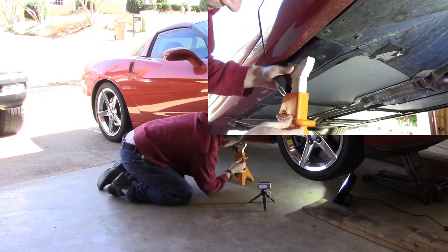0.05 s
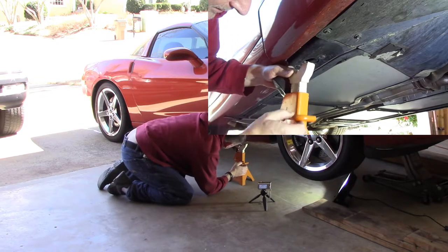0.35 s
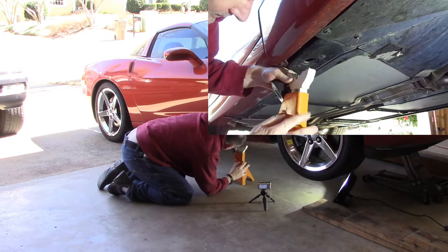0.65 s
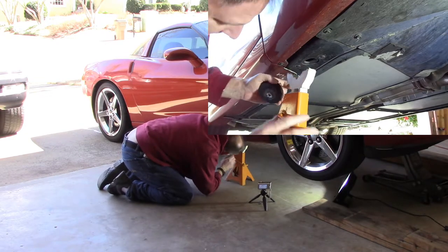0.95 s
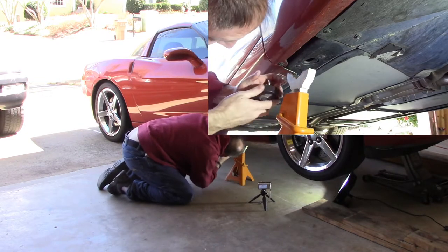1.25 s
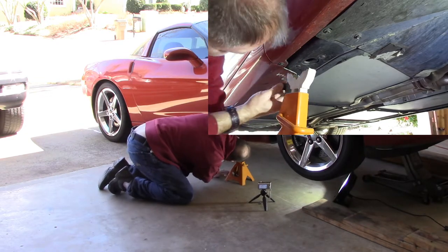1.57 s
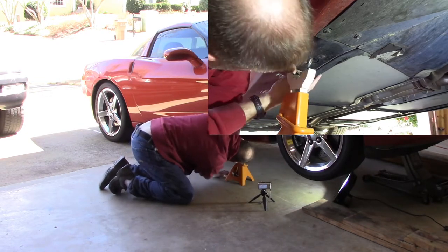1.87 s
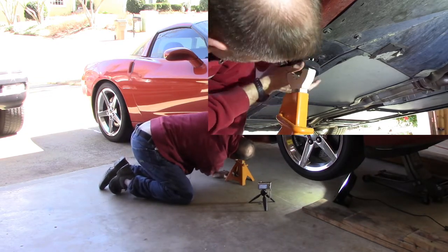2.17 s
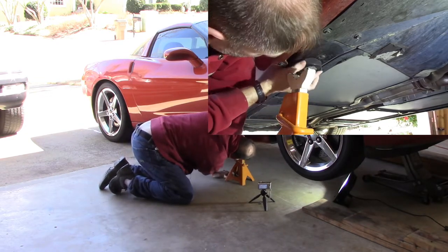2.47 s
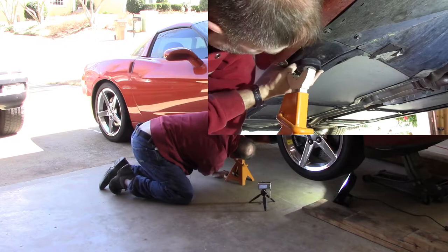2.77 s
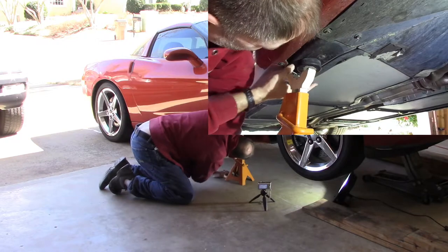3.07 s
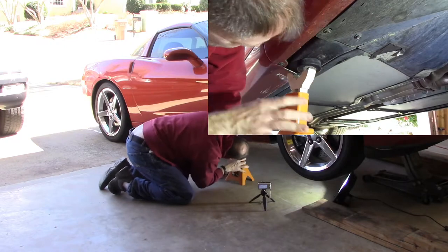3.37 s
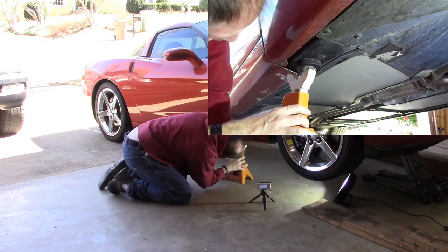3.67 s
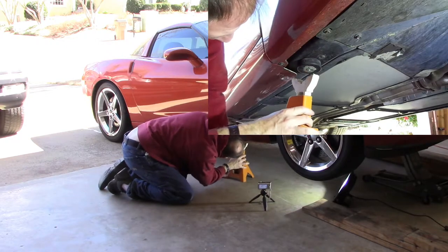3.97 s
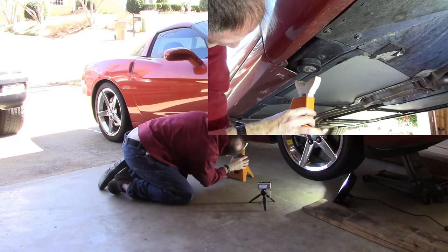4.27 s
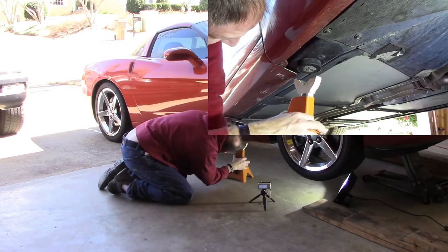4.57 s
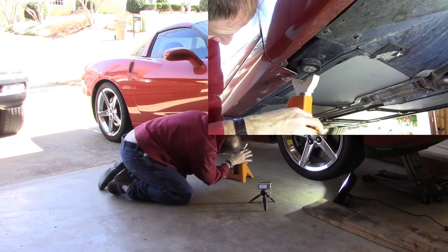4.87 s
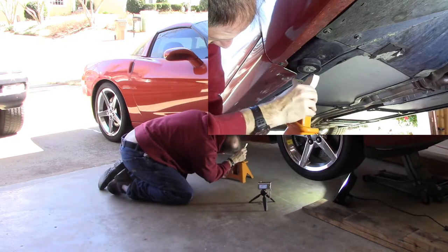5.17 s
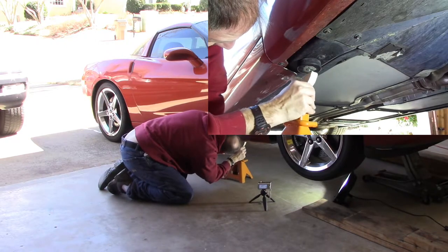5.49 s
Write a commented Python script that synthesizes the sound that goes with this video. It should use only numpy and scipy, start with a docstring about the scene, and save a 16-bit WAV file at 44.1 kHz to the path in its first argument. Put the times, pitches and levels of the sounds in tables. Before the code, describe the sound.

Close up in an open garage, a steel stand's post slides, rattles and falls with a loud clank. A run of hollow knocks follows as a rubber pad is pushed into the underside of a car. After a soft rustle of clothing, the stand scrapes across concrete in two pulls, the second quieter. Finally the post slides up again, its ratchet clicking and pinging, over faint outdoor air.

```python
"""Jack stand under a car

A steel stand is set in an open garage, heard close and nearly mono. Its ratchet post rattles and drops
with a clank, a shirt sleeve brushes by and a rubber pad knocks home in the hollow underbody. The stand
is dragged over concrete, grit ringing its frame; the post is drawn up again, its pawl pinging."""
import sys
import numpy as np
from scipy import signal
from scipy.fft import rfft, irfft
from scipy.io import wavfile
from scipy.ndimage import uniform_filter1d

SR = 44100
rng = np.random.default_rng(int(sys.argv[2]) if len(sys.argv) > 2 else 0)


def to_wav(sig):
    """Store sig (one row per channel, or 1-D mono) as 16-bit WAV at the path in sys.argv[1].

    Samples outside -1..1 are clipped; the rate is SR.
    """
    pcm = np.clip(np.atleast_2d(sig), -1, 1) * 32767
    pcm = np.round(pcm).astype(np.int16)
    wavfile.write(sys.argv[1], SR, pcm.T)  # frames by channels


N = 248283
TIME_S = np.arange(N) / SR
RING_TIME_S = TIME_S[:16384]

# Spectra. Each row: frequency in Hz, relative level in dB.
AIR_SPECTRUM = [(15,-29), (40,-6), (70,-6.5), (120,-8.5), (230,-12), (400,-16), (800,-22), (1500,-25),
                (3500,-32), (15500,-33.5)]
STEEL_SPECTRUM = [(80,-27), (200,-16), (380,-15.5), (590,-16), (830,-6.5), (1080,-22), (1400,-7),
                  (1900,-0.5), (2600,-3), (3700,1), (5000,-8.5), (6300,-16.5), (10000,-20.5), (15500,-42)]
PAINT_SPECTRUM = [(1500,-29), (4000,-7.5), (6000,-1.5), (9000,0), (12000,-3.5), (15500,-7.5)]  # painted steel sliding on itself
LONG_POST_EQ = [(900,-1), (1350,-5), (1900,1), (2400,-2.5), (3400,-11.5), (4100,-14), (5000,-3),
                (7000,-2.5)]  # drawn-out post against short post
CLOTH_SPECTRUM = [(35, -35.5), (60, -18), (87, -4.5), (156, -6), (305, -8.5), (403, -9), (773, -16),
                  (1590, -15), (2010, -19.5), (3840, -23.5), (15500, -32.5)]
CRACKLE_SPECTRUM = [(120, -87), (200, -0.5), (715, 1), (1090, -1), (1710, 0), (4410, 2.5), (7760, 4.5),
                    (12500, 2), (15500, -8)]
PANEL_SPECTRUM = [(60,-29), (260,-11.5), (370,-20), (480,-5.5), (680,-19), (830,-17), (1120,-19.5),
                  (1400,-15), (2700,-29.5), (4900,-31), (6400,-35), (7700,-35.5), (11200,-41.5),
                  (13000,-53)]
GRIT_SPECTRUM = [(47, -62), (80, -31), (216, -16), (328, -19), (498, -9), (774, -11), (923, -1),
                 (1050, -18), (1370, -12), (3540, -12.5), (4040, -23.5), (4930, -15.5), (6710, -24),
                 (8740, -20.5), (15500, -31.5)]
# Registers. Each row: lower and upper edge in Hz.
CLANK_BANDS_HZ = [(1200, 3200), (90, 650), (650, 1200), (3200, 5500), (5500, 17000)]  # clang, thump, wall, bite, edge
FRICTION_BANDS_HZ = [(650, 5500), (90, 650), (5500, 17000)]  # scrape, rumble, hiss
KNOCK_BANDS_HZ = [(390, 640), (130, 350), (850, 2600), (2600, 12000)]  # hollow note, thud, clack, click
# Modes. Each row: frequency in Hz, relative level in dB, free t60 in seconds.
STEEL_POST_MODES = [(813.4,-13,0.26), (912,-3,0.15), (1184,-16,0.29), (1640,-7,0.24), (1830,-13.5,0.2),
                    (1966,4,0.089), (1906,-6.5,0.24), (2158,-3.5,0.5), (2270,-10.5,0.26), (2519,-12,0.92),
                    (2740,-2.5,0.22), (3010,4.5,0.071), (3114,-9,0.077), (3080,-6,.12), (3337,2.5,0.054),
                    (3470,0,0.19), (3482,-2.5,0.077), (3596,5,.15), (3530,5.5,0.13), (4190,6,0.17),
                    (4650,-9.5,0.24), (4780,-11.5,0.42), (5230,-10.5,.08), (5990,-12.5,.12), (6000,-12,.12),
                    (6680,-17,0.12), (7025,-10,0.35), (7180,-15.5,.16), (7306,-16,.15), (8600,-28.5,0.17)]
UNDERBODY_MODES = [(485.3,6.5,0.083), (513.4,-3,0.1), (641,-10,0.12), (697,-7.5,0.16), (900,-15,0.12),
                   (1300,-16,0.095), (1394,-4,0.072), (1580,-24,0.053), (1950,-43.5,0.076),
                   (1990,-15,0.069), (2490,-16.5,0.074), (3000,-12,0.047), (3820,-13,0.074),
                   (4470,-5.5,0.038), (5400,-17.5,0.067), (7400,-18,0.043)]
PING_MODES = [(3710, -4, 0.21), (7240, 1.5, 0.1), (7390, -19, .12), (8270, -12.5, .082), (8840, -18, .12),
              (12200, -22.5, .06), (13300, -17, .14), (14980, -12, .07)]
# Dragged frame. Each row: resonance in Hz, width in Hz, relative peak in dB.
FRAME_RESONANCES = [(214, 10, -34), (480, 3.8, -24), (904.4, 25, 2), (1292, 300, -11), (1698, 67, -9.5),
                    (1923, 93, -7.5), (2186, 70, -6.5), (2630, 34, -10.5), (2650, 15, -3.5),
                    (2890, 45, -10), (3230, 190, -18.5), (3570, 126, -7), (4450, 67, -11),
                    (4460, 21, -19.5), (4840, 31, -7), (5380, 35, -15), (5760, 32, -14), (5840, 61, -13),
                    (6300, 39, -11.5), (7300, 55, -13), (7700, 43, -28), (8530, 50, -25), (8860, 89, -21),
                    (9450, 110, -25), (10600, 230, -23), (9760, 41, -29), (11200, 47, -20),
                    (12000, 58, -19), (12400, 33, -30), (13200, 37, -32)]

# Post hits stand. Each row: start in seconds, clang in dB, relative depth in dB, relative edge in dB.
POST_CLANKS = [(0.0436,-40,-3,-54), (0.083,-47.5,7.5,-32), (0.1098,-32,-7.5,-34), (0.1635,-38.5,5.5,-11),
               (0.181,-36,2.5,-24), (0.2115,-29.5,-6,-64), (0.2604,-49,9.5,-14), (0.3485,-61,13.5,-12),
               (0.401,-20.5,-9.5,-16.5), (0.567,-55,8.5,-8.5), (0.590,-53.5,15.5,-9), (0.6035,-12,-7.5,-9),
               (0.6174,-14,-13,-2), (0.623,-18.5,-10,-10), (4.623,-49.5,18,4), (5.237,-44,2,-33),
               (5.3058,-21.5,-11.5,-47), (5.3274,-25,-4.5,-29), (5.3424,-27.5,-7,-17),
               (5.3754,-46.5,13,-23), (5.5785,-25.5,-8.5,-26.5), (5.5884,-26,-5,-24)]
# Post slides. Each row: peak time, hold and attack in seconds, level in dB, relative hiss in dB.
POST_STROKES = [(0.157,0.031,0.38,-46.5,-5), (0.231,0.011,.1,-44.5,-26), (0.299,0.012,0.12,-59,0.5),
                (0.39,0.016,0.085,-55,0), (0.56,0.056,0.23,-60.5,-5.5), (5.264,0.0056,0.028,-38,-18),
                (5.306,0.074,0.04,-30,-24), (5.585,.05,0.037,-28,-22.5)]
# Floor and car. Each row: start in seconds, level in dB, band centre in Hz, t60 in seconds.
THUDS = [(0.604,-35.5,192,0.092), (0.616,-41,160.7,0.26), (1.264,-52.5,152,0.073), (1.582,-44,171.6,0.049),
         (2.257,-47,100,.18), (3.183,-43,84,0.03)]
# Shirt sleeve catches. Each row: start in seconds, length in seconds, level in dB.
SHIRT_BRUSHES = [(0.959, 0.021, -63.5), (1.07, .016, -62.5), (1.263, 0.0049, -57), (1.397, 0.014, -49.5),
                 (1.405, 0.064, -46), (1.6, 0.028, -65.5), (3.344, 0.015, -51.5), (3.367, 0.035, -42)]
# Pad hits underbody. Each row: start in seconds, hollow note in dB, contact hardness in dB.
PAD_KNOCKS = [(1.604,-53,3), (1.727,-48.5,-2), (1.779,-33.5,2.5), (1.807,-26.5,-1.5), (1.832,-28.5,-17),
              (1.927,-39.5,-15), (1.945,-34.5,-23.5), (2.0476,-36.5,5.5), (2.128,-40.5,-23),
              (2.164,-42.5,7), (2.2,-36.5,-6), (2.233,-27,-13), (2.2535,-20.5,-4), (2.257,-13.5,-19),
              (2.542,-31,-1.5), (2.58,-45.5,-7), (2.663,-46,-10.5)]
# Small impacts. Each row: start in seconds, level in dB.
SHIRT_TICKS = [(3.351, -38.5)]
PAWL_PINGS = [(5.2668, -33.5)]
# Friction gestures. Each row: peak time in seconds, hold in seconds, level in dB.
WALL_SQUEALS = [(0.165,0.076,-40), (0.405,0.021,-41), (3.72,0.036,-43), (3.87,0.078,-39.5),
                (4.175,0.023,-41), (5.242,.008,-56), (5.334,0.012,-32), (5.412,0.0097,-35.5),
                (5.48,0.1,-66), (5.612,.02,-35.5)]
CLOTH_RUSTLES = [(0.9,0.2,-61), (1.27,0.23,-61.5), (1.6,0.03,-59), (3.07,0.056,-56), (3.25,0.18,-52),
                 (5.11,0.014,-58)]
RIM_SCUFFS = [(2.03,0.01,-41), (2.223,0.0074,-34.5)]
FOOT_JUDDERS = [(3.74,0.027,-47), (3.87,0.024,-51), (4.78,0.044,-44)]
# Friction curves. Each row: time in seconds, relative level in dB.
PAD_RUB_CURVE = [(1.70,-56.5), (1.84,-40), (1.9,-53.5), (2.16,-46), (2.245,-37), (2.32,-42.5), (2.40,-58),
                 (2.6,-52), (2.75,-64)]
DRAG_CURVES = [
    [(3.62, -78), (3.64, -57), (3.71, -32), (3.924, -32.5), (4.006, -38), (4.122, -39.5), (4.14, -41.5),
     (4.196, -39), (4.28, -65)],
    [(4.28,-66), (4.36,-55.5), (4.455,-57.5), (4.51,-46.5), (4.56,-41.5), (4.665,-46.5), (4.74,-39.5),
     (4.81,-47.5), (4.87,-77)],
]  # two curves, one per pull


def amp(db):
    """Decibels to gain."""
    return 10 ** (np.asarray(db) / 20)


def unit(x):
    """Scale to rms 1."""
    return x / np.sqrt(np.mean(x ** 2) + 1e-24)


def crest(x):
    """Scale the loudest 4 ms to rms 1."""
    return x / np.sqrt(uniform_filter1d(x ** 2, size=176, mode="constant").max() + 1e-24)


def fade(t60_s):
    """Exponential decay, 60 dB per t60_s."""
    return np.exp(-np.log(1000) * RING_TIME_S / t60_s)


def burst(t60_s):
    """Decaying white noise."""
    return rng.standard_normal(len(RING_TIME_S)) * fade(t60_s)


def partial(hz):
    """Sine at random phase."""
    return np.sin(2 * np.pi * hz * RING_TIME_S + rng.uniform(0, 2 * np.pi))


def colour(x, spectrum):
    """Minimum-phase filter from (Hz, dB) rows."""
    hz, db = np.transpose(spectrum)
    grid_hz = np.linspace(1, SR / 2, 1025)
    gain = amp(np.interp(np.log(grid_hz), np.log(hz), db))
    cepstrum = irfft(np.log(gain))
    half = len(cepstrum) // 2
    folded = np.r_[cepstrum[0], 2 * cepstrum[1:half], np.zeros(half)]
    response = irfft(np.exp(rfft(folded)))
    return signal.oaconvolve(x, response)[:len(x)]


def split(x, bands_hz):
    """One signal per band."""
    filters = [signal.butter(3, band, "band", fs=SR, output="sos") for band in bands_hz]
    return [signal.sosfilt(sos, x + 1e-18) for sos in filters]


def add(out, start_s, x):
    """Mix x into out at start_s."""
    start = int(start_s * SR)
    part = x[:max(len(out) - start, 0)]
    out[start:start + len(part)] += part


def grains(n, rate_hz, spread_db):
    """Random micro-slips of uneven size, rms 1."""
    sizes = amp(spread_db * np.minimum(rng.exponential(size=n), 5))
    return unit((rng.random(n) < rate_hz / SR) * rng.standard_normal(n) * sizes)


def drift(rate_hz):
    """Smooth random wander, spread near 1."""
    hold = int(SR / rate_hz)
    steps = np.repeat(rng.standard_normal(N // hold + 1), hold)
    return 1.2 * uniform_filter1d(steps, size=hold)[:N]


def swell(curve):
    """Gain along (s, dB) rows, zero outside."""
    at_s, db = np.transpose(curve)
    return amp(np.interp(TIME_S, at_s, db)) * (TIME_S >= at_s[0]) * (TIME_S <= at_s[-1])


def envelope(peak_s, hold_s, attack_s, release_s):
    """Rise 60 dB per attack_s until peak_s, hold, fall 60 dB per release_s."""
    early = np.maximum(peak_s - TIME_S, 0) / attack_s
    late = np.maximum(TIME_S - peak_s - hold_s, 0) / release_s
    return np.exp(-np.log(1000) * np.minimum(early + late, 10))


def gestures(rows, attack_s, release_s):
    """Summed envelopes with common attack and release."""
    return sum(amp(db) * envelope(peak_s, hold_s, attack_s, release_s) for peak_s, hold_s, db in rows)


def body(modes, spectrum, t60_s, modes_db, freedom=1):
    """Impulse response: clear modes over a dense crowd; a tight grip (freedom < 1) shortens the modes."""
    clear = sum(amp(db) * fade(free_s * freedom) * partial(hz) for hz, db, free_s in modes)
    crowd = colour(burst(t60_s), spectrum)
    return unit(crowd) + amp(modes_db) * unit(clear)


def blow(modes, spectrum, bands_hz, shares_db, t60_s, modes_db, freedom, chatter_s):
    """Contact chatter and ring; shares_db sets the other bands against the first."""
    hz, db, free_s = np.transpose(modes)
    detune, scatter = rng.standard_normal((2, len(hz)))
    struck = np.c_[hz * (1 + 0.004 * detune), db + 3 * scatter, free_s]  # grip and strike point vary
    contact = np.exp(-np.minimum(RING_TIME_S / chatter_s, 10) ** 2)
    chatter = colour(rng.standard_normal(len(RING_TIME_S)) * contact, spectrum)
    ring = crest(body(struck, spectrum, t60_s, modes_db, freedom))
    parts = split(ring + amp(-6) * crest(chatter), bands_hz)
    return sum(amp(share_db) * crest(part) for share_db, part in zip([0, *shares_db], parts))


def friction(response, rate_hz, spread_db, catch_db):
    """Slips catch and let go, ringing a body: scrape, rumble, hiss, each at rms 1."""
    slips = grains(N, rate_hz, spread_db) * amp(catch_db * drift(rate_hz=110))
    ringing = signal.oaconvolve(slips, response)[:N]
    return [unit(part) for part in split(ringing, FRICTION_BANDS_HZ)]


def background(hum_hz=80.7):
    """Outdoor air through the door, faint hum, slight stereo hiss."""
    air = amp(-60) * unit(colour(rng.standard_normal(N), AIR_SPECTRUM))
    hum = amp(-75) * np.sin(2 * np.pi * hum_hz * TIME_S)
    side = amp(-69.5) * rng.standard_normal(N)
    side += amp(-82.5) * unit(colour(rng.standard_normal(N), AIR_SPECTRUM))
    return air + hum + np.array([side, -side])


def post(thump_db=-5, wall_db=4):
    """The loose post rattles, drops and slides in its steel sleeve; drawn out, it sounds darker."""
    steel = np.zeros(N)
    for start_s, db, depth_db, edge_db in POST_CLANKS:
        bite_db = 4.5 + 0.2 * edge_db
        shares_db = [depth_db + thump_db, depth_db + wall_db, bite_db, edge_db]
        clank = blow(STEEL_POST_MODES, STEEL_SPECTRUM, CLANK_BANDS_HZ, shares_db,
                     t60_s=0.13, modes_db=3, freedom=0.39, chatter_s=0.011)
        add(steel, start_s, amp(db) * clank)
    sleeve = body(STEEL_POST_MODES, STEEL_SPECTRUM, t60_s=0.074, modes_db=1, freedom=0.51)
    scrape, rumble, _ = friction(sleeve, rate_hz=1800, spread_db=1, catch_db=1.9)
    hiss = unit(colour(grains(N, rate_hz=6000, spread_db=0.5), PAINT_SPECTRUM))
    for peak_s, hold_s, attack_s, db, hiss_db in POST_STROKES:
        rumble_db = -27.5 + 0.44 * db
        stroke = amp(db) * (scrape + amp(hiss_db) * hiss) + amp(rumble_db) * rumble
        steel += stroke * envelope(peak_s, hold_s, attack_s, release_s=0.2)
    drawn_out = np.interp(TIME_S, [4.9, 5.2], [0, 1])
    return (1 - drawn_out) * steel + drawn_out * colour(steel, LONG_POST_EQ)


def squeal(mode_hz=924, wander_hz=11, shimmer_db=2.2):
    """Friction feeds the stand's wall mode unevenly; the tone wavers."""
    phase = 2 * np.pi * np.cumsum(mode_hz + wander_hz * drift(rate_hz=90)) / SR
    tone = unit(np.sin(phase) * amp(shimmer_db * drift(rate_hz=29)))
    return tone * gestures(WALL_SQUEALS, attack_s=0.24, release_s=0.17)


def thuds():
    """Floor and car, heavy and damped, answer with a few low cycles."""
    out = np.zeros(N)
    for start_s, db, hz, t60_s in THUDS:
        octave, = split(burst(t60_s), [(hz / np.sqrt(2), hz * np.sqrt(2))])
        add(out, start_s, amp(db) * crest(octave))
    return out


def clothes():
    """Cloth shifts, fibres snap in dry crackles, something hard on the shirt sleeve ticks."""
    cloth = unit(colour(grains(N, rate_hz=6000, spread_db=-1), CLOTH_SPECTRUM))
    out = cloth * gestures(CLOTH_RUSTLES, attack_s=0.32, release_s=0.48)
    for start_s, length_s, db in SHIRT_BRUSHES:
        fibres = grains(int(length_s * SR), rate_hz=7200, spread_db=2)
        add(out, start_s, amp(db) * unit(colour(fibres, CRACKLE_SPECTRUM)))
    for start_s, db in SHIRT_TICKS:
        tick, = split(burst(t60_s=0.014), [(150, 1600)])
        add(out, start_s, amp(db) * crest(tick))
    return out


def pad(thud_db=-15):
    """The rubber pad knocks, rubs and scuffs on the hollow underbody, damping it."""
    knocks = np.zeros(N)
    for start_s, db, hardness_db in PAD_KNOCKS:
        click_db = -6.5 + 2.23 * hardness_db  # hard contact lifts click faster than clack
        knock = blow(UNDERBODY_MODES, PANEL_SPECTRUM, KNOCK_BANDS_HZ, [thud_db, hardness_db, click_db],
                     t60_s=0.17, modes_db=6.5, freedom=0.86, chatter_s=0.0054)
        add(knocks, start_s, amp(db) * knock)
    seat = body(UNDERBODY_MODES, PANEL_SPECTRUM, t60_s=0.064, modes_db=-1, freedom=0.79)
    rub = signal.oaconvolve(grains(N, rate_hz=1900, spread_db=3), seat)[:N]
    rim, = split(rub, [(900, 6000)])
    scuffs = unit(rim) * gestures(RIM_SCUFFS, attack_s=0.02, release_s=0.07)
    return knocks + amp(-3) * unit(rub) * swell(PAD_RUB_CURVE) + scuffs


def drag():
    """Grit under the feet rings the frame; the feet judder as they skid."""
    peaks = sum(amp(db) * width_hz * np.exp(-np.pi * width_hz * RING_TIME_S) * partial(hz)
                for hz, width_hz, db in FRAME_RESONANCES)
    crowd = colour(burst(t60_s=0.19), GRIT_SPECTRUM)
    frame = unit(crowd) + amp(1.5) * unit(peaks)
    scrape, rumble, hiss = friction(frame, rate_hz=3000, spread_db=3.5, catch_db=0.7)
    pull = sum(swell(curve) for curve in DRAG_CURVES)
    grit = pull ** 0.86 * (amp(-14) * rumble + amp(-16) * hiss)  # swells less than the scrape
    skid, = split(grains(N, rate_hz=490, spread_db=2.5), [(170, 255)])
    judder = unit(skid) * gestures(FOOT_JUDDERS, attack_s=0.51, release_s=0.17)
    return pull * scrape + grit + judder


def pawl():
    """The small hard pawl springs against the post and rings high."""
    out = np.zeros(N)
    for start_s, db in PAWL_PINGS:
        ping = body(PING_MODES, CRACKLE_SPECTRUM, t60_s=0.13, modes_db=1.5)
        add(out, start_s, amp(db) * crest(ping))
    return out


def garage(x, wet_db=-26.5, build_s=0.012):
    """Floor, car and walls return a short tail; most of the treble dies first."""
    noise = rng.standard_normal(len(RING_TIME_S))
    middle, low, high = split(noise, [(1340, 3300), (150, 1100), (3273, 17000)])
    tail = middle * fade(0.49) + amp(1.5) * low * fade(0.4)
    tail += high * (amp(-4) * fade(0.1) + amp(-18.5) * fade(0.94))
    tail *= 1 - np.exp(-(RING_TIME_S / build_s) ** 2)
    return amp(wet_db) * signal.oaconvolve(x, tail / np.linalg.norm(tail))[:N]


def scene():
    """Centred handling with garage tail, dry clothes, stereo background."""
    handling = post() + pawl() + pad() + thuds() + drag() + squeal()
    return handling + garage(handling) + clothes() + background()


def record(dry):
    """Soft peak limit, steep low-pass."""
    ceiling, top_hz = 0.92, 15850
    rounded = dry / (1 + (dry / ceiling) ** 6) ** (1 / 6)
    return signal.sosfilt(signal.ellip(10, 0.2, 70, top_hz, fs=SR, output="sos"), rounded)


dry = scene()
out = record(dry)
to_wav(out)
```